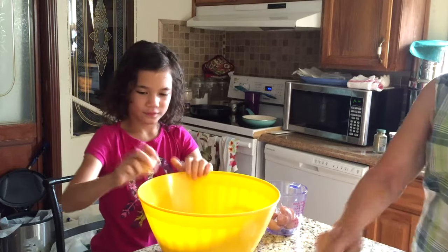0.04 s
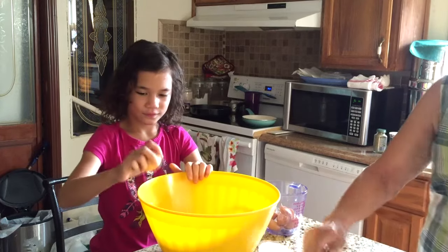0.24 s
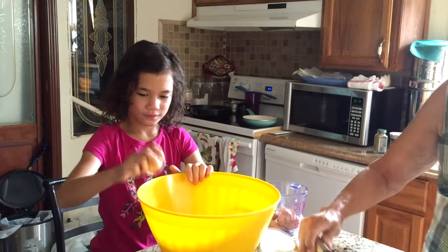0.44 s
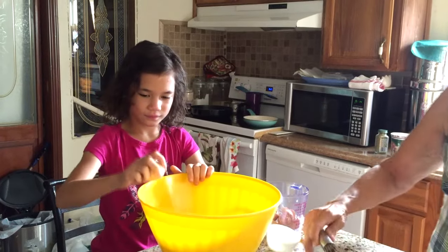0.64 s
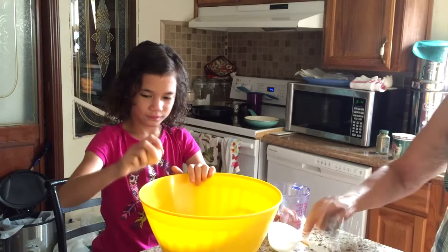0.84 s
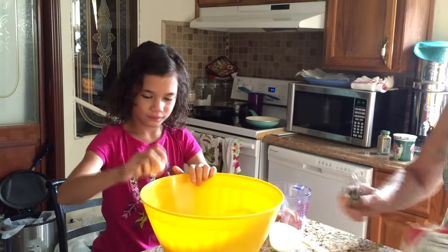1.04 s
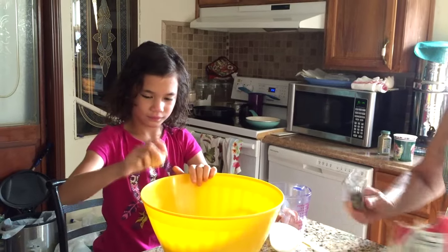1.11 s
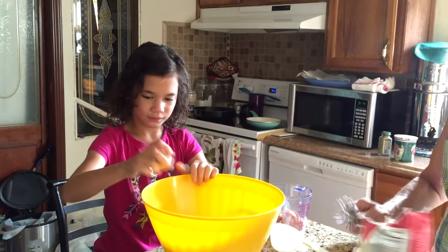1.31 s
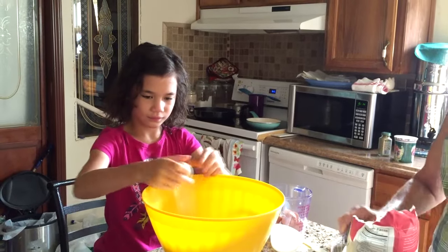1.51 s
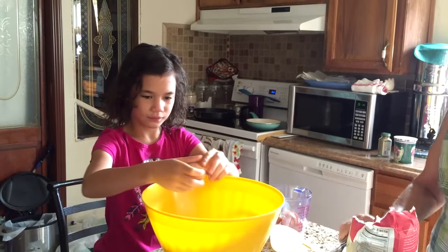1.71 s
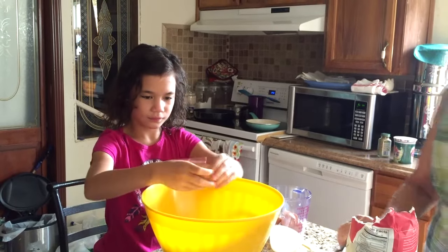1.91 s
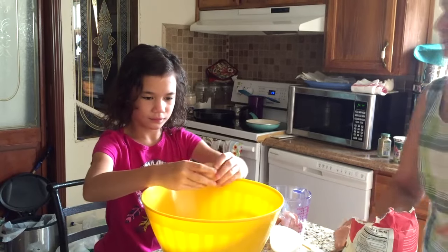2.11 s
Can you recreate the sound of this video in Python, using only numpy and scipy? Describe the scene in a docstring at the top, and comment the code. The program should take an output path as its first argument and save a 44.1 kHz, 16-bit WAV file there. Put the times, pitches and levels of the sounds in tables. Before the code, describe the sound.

Hollow clacks of an egg cracked on a plastic bowl, then a rustle and clinks.

```python
"""An egg is knocked on the rim of a big plastic bowl, close to one microphone in a quiet kitchen.
The rim clacks, the wall thumps, the bowl rocks back, and the last blow crushes the shell.
Bits of shell tick. Something, probably a paper bag, slides over the counter with a friction hiss,
and metal utensils clink at the end. Low resonances of the room linger after each knock."""
import sys
import numpy as np
from scipy import signal
from scipy.fft import rfft, irfft
from scipy.io import wavfile
from scipy.ndimage import uniform_filter1d

SR = 44100
rng = np.random.default_rng(int(sys.argv[2]) if len(sys.argv) > 2 else 0)


def output_pcm(signal):
    """Save a mono or channel-first signal as 16-bit PCM at the path in sys.argv[1].

    Samples are clipped to [-1, 1] before scaling.
    """
    pcm = np.clip(np.atleast_2d(signal).T, -1, 1) * 32767
    wavfile.write(sys.argv[1], SR, np.round(pcm).astype(np.int16))


N = 94815
HIT_SAMPLES = 24576


def undb(db):
    """Decibels to gain."""
    return 10 ** (np.asarray(db) / 20)


def clock(size=HIT_SAMPLES):
    """Time of each sample in seconds."""
    return np.arange(size) / SR


def hiss(size=HIT_SAMPLES):
    """White noise."""
    return rng.standard_normal(size)


def wander(rate_hz, size=HIT_SAMPLES):
    """Slow random drift with a spread near 1."""
    step = int(SR / rate_hz)
    return uniform_filter1d(np.repeat(hiss(size // step + 1), step), step)[:size]


def fade(t60):
    """Exponential decay, 60 dB in t60 seconds."""
    return np.exp(-np.log(1000) * clock() / t60)


def add(out, at, x):
    """Mix a sound in at a time."""
    part = out[int(at * SR):][:len(x)]
    part += x[:len(part)]


def colour(x, points, size=4096):
    """Minimum-phase filter through (f/Hz, level/dB) points; keeps the power of white noise."""
    hz, db = np.array(points).T
    log_hz = np.log(np.fft.rfftfreq(size, 1 / SR) + 1)
    cepstrum = irfft(np.log(undb(np.interp(log_hz, np.log(hz), db))))
    cepstrum[1:size // 2] *= 2
    cepstrum[size // 2 + 1:] = 0
    impulse = irfft(np.exp(rfft(cepstrum)))[:size // 2]
    return signal.fftconvolve(x, impulse / np.linalg.norm(impulse))[:len(x)]


def ring(modes, rattle_rad=0):
    """Resonances as decaying sines; loose contact can jolt their phase."""
    out = 0
    for hz, db, t60 in modes:
        jolt = rattle_rad * wander(rate_hz=130) if rattle_rad else 0
        out += undb(db) * fade(t60) * np.sin(2 * np.pi * hz * clock() + jolt)
    return out


def flex(modes, pitch=1):
    """Heavily damped bending that swells and dies within a few cycles."""
    out, t = 0, clock()
    for hz, rise, db in modes:
        swell = (t / rise * np.exp(1 - np.minimum(t / rise, 20))) ** 2
        out += undb(db) * swell * np.sin(2 * np.pi * hz * pitch * t)
    return out


def rubbing(levels, spectrum, flicker_db=.6):
    """Fine-grained friction hiss with uneven pressure."""
    db = np.interp(clock(N), *np.array(levels).T) + flicker_db * wander(rate_hz=35, size=N)
    return undb(db) * colour(rng.laplace(0, np.sqrt(.5), N), spectrum)


# Room tone spectrum: f/Hz, level/dB
AIR_SPECTRUM = [(25, -11), (60, -3), (150, 4), (300, -1), (600, -10), (1200, -14), (2100, -17),
                (3500, -21.5), (9000, -35), (16000, -38)]

def room_tone():
    """The kitchen's quiet air, a low rush all around the microphone."""
    return undb(-64.5) * colour(hiss(N), AIR_SPECTRUM)


# Diffuse tail by band: f/Hz, t60/s, level/dB
TAIL_BANDS = [(100, 0.19, 1.5), (213, 0.3, 3.5), (450, 0.29, 0), (905, 0.34, 3.5), (1600, .36, -0.5),
              (3060, 0.25, 1.5), (6000, .28, 1), (13900, .2, -20.5)]
# First echoes: t/s, gain
FIRST_ECHOES = [(0.0132, 0.057), (0.0204, 0.12)]

def kitchen(direct, tail_db=-3.5, build_s=.004):
    """Direct sound reaches the microphone, then echoes off wall and cupboards and a short tail."""
    response, noise = np.zeros(HIT_SAMPLES), rfft(hiss())
    log_hz = np.log(np.fft.rfftfreq(HIT_SAMPLES, 1 / SR) + 1)
    log_centres = np.log(np.array(TAIL_BANDS)[:, 0])
    for share, (_, t60, db) in zip(np.eye(len(TAIL_BANDS)), TAIL_BANDS):
        band = irfft(noise * np.interp(log_hz, log_centres, share))
        envelope = fade(t60) * (1 - np.exp(-clock() / build_s))
        response += undb(db + tail_db) * envelope / np.linalg.norm(envelope) * band
    for lag, gain in FIRST_ECHOES:
        response[int(lag * SR)] += gain
    return direct + signal.fftconvolve(direct, response)[:N]


# Handling noise: t/s, level/dB
HANDLING_LEVELS = [(0.225, -89), (0.25, -60), (0.31, -69.5), (0.37, -60.5), (0.41, -68.5), (0.45, -54.5),
                   (0.55, -59.5), (0.6, -74)]

def handling():
    """Things rub faintly on the counter, with the colour of the ticks."""
    return rubbing(HANDLING_LEVELS, TICK_SPECTRUM)


# Course of the slide: t/s, level/dB
SLIDE_LEVELS = [(0.71, -75), (0.75, -50.5), (0.9, -53.5), (1.05, -48.5), (1.35, -48.5), (1.5, -50.5),
                (1.6, -56.5), (1.665, -58), (1.70, -67.5), (1.8, -68.5)]
# Its friction spectrum: f/Hz, level/dB
SLIDE_SPECTRUM = [(200, -26.5), (800, -14), (1400, -1), (2300, 7.5), (3300, -5), (5000, -4.5), (6500, -6),
                  (9300, -4), (10600, -13.5), (13000, -8.5), (16000, -9.5)]

def bag_slide():
    """Something like a paper bag drags over the counter."""
    return rubbing(SLIDE_LEVELS, SLIDE_SPECTRUM)


# Clinks: t/s, bright level/dB, dull level/dB
UTENSIL_CLINKS = [(2.0295, -37.5, -36.5), (2.0353, -34.5, -45.5), (2.0935, -37.5, -35), (2.1455, -43, -46)]
# Metal modes, dull and bright: f/Hz, level/dB, t60/s
DULL_MODES = [(655, -5, 0.18), (1155, -3, 0.1), (1642.5, -0.5, 0.15), (1953, 2, 0.044), (2600, -37, 0.094)]
BRIGHT_MODES = [(4445, -20.5, 0.18), (6126, -7.5, 0.17), (7429, -19, 0.25), (8600, -11.5, 0.17),
                (8430, -5, 0.32), (8767, 1, 0.15), (9520, -1.5, .15), (9860, -7.5, 0.14), (11450, -4.5, .2),
                (13360, -8, 0.2)]
# Crowded upper modes: f/Hz, level/dB
CLATTER_SPECTRUM = [(300, -30), (1100, -0.5), (2200, 4), (3200, -3), (7500, -3.5), (9000, 4.5),
                    (10500, 3.5), (13000, 1.5), (16000, -7)]

def utensils(clatter_db=4.5, modes_db=-4):
    """Thin metal pieces strike each other, rattle and ring."""
    out = np.zeros(N)
    for at, bright_db, dull_db in UTENSIL_CLINKS:
        clatter = undb(clatter_db) * colour(hiss() * fade(t60=.19), CLATTER_SPECTRUM) / 2
        bright = undb(modes_db) * ring(BRIGHT_MODES, rattle_rad=.55)
        dull = undb(modes_db) * ring(DULL_MODES, rattle_rad=.55)
        add(out, at, undb(bright_db) * (bright + clatter) + undb(dull_db) * dull)
    return out


# Ticks: t/s, snap level/dB, body level/dB
SMALL_TICKS = [(0.2745, -31, -52), (0.4163, -24.5, -26), (0.4306, -72, -20.5), (0.4315, -30, -19.5),
               (0.7434, -29, -36), (0.7507, -36, -62), (0.829, -31.5, -18), (1.576, -41, -42),
               (1.615, -36.5, -47.5), (1.643, -38.5, -38), (1.820, -44.5, -54), (1.872, -51, -49),
               (2.001, -64, -43)]
# Snap spectrum: f/Hz, level/dB
TICK_SPECTRUM = [(500, -7.5), (2000, 7.5), (4000, -1), (6500, -4), (8700, 4.5), (10500, -11), (14000, -5),
                 (16000, -5)]

def ticks(decay_s=.001):
    """Bits of shell and handled things snap brightly, each with a little hollow body."""
    snaps, bodies, body = np.zeros(N), np.zeros(N), flex(RIM_FLEX)
    envelope = .5 * np.exp(-clock() / decay_s)
    for at, snap_db, body_db in SMALL_TICKS:
        add(snaps, at, undb(snap_db) * envelope * hiss())
        add(bodies, at, undb(body_db) * body)
    return colour(snaps, TICK_SPECTRUM) + bodies


# Eggshell spectrum: f/Hz, level/dB
SHELL_SPECTRUM = [(300, -12), (1000, -2.5), (1600, 3.5), (2700, 9.5), (4000, -8), (6500, -7), (9000, -10.5),
                  (10500, -13.5), (14000, -17), (16000, -8.5)]

def shell_crack(snap_s=.001, crush_s=.009):
    """The shell snaps, then crushes in a grainy burst that stops short."""
    t = clock()
    snap = np.exp(-t / snap_s)
    crush = undb(-1) * np.exp(-t / crush_s) / (1 + (t / crush_s) ** 10)
    return colour((snap + crush) * rng.laplace(0, .25, HIT_SAMPLES), SHELL_SPECTRUM)


# The bowl's quick bending under a blow: f/Hz, rise/s, level/dB
WALL_FLEX = [(456, .0021, -1), (202.4, 0.0063, -22), (554, 0.0024, -16.5), (89, .025, -46),
             (864, 0.0023, -19)]
RIM_FLEX = [(1662, 0.00057, 1.5), (1358, 0.0019, -14), (2175, 0.00067, -27.5), (2865, 0.00075, -19)]
# Ringing of the rim: f/Hz, level/dB, t60/s
RIM_RING = [(1268, -14, 0.073), (1326, 5, .26), (1473, 15, 0.15), (1473, 0.5, 0.15), (1672, 5, 0.083),
            (1710, -11, .25), (2217, -5.5, 0.2), (2660, -6.5, 0.12)]
# Low resonances of the room that linger after each knock: f/Hz, level/dB, t60/s
ROOM_RING = [(223.4, 3, 0.17), (405.8, 1, 0.4), (470, -22.5, 0.84), (503, -20, 0.23), (480, -16.5, 0.22),
             (536, 3, .3), (602, -18.5, 0.2), (782, -10.5, 0.32)]
# Knocks and nudges of egg and hand, and the bowl rocking back:
# t/s, thump level/dB, rim level/dB, shell level/dB, pitch ratio of the wall's bending
BOWL_KNOCKS = [(0.2273, -6.5, -13, -36, 1.024), (0.423, -33.5, -40.5, -56, 0.52),
               (0.4856, -8.5, -12.5, -36, 1.02), (0.5341, -13, -11, -33.5, 1.07),
               (0.5439, -23.5, -20.5, -37.5, 1.23), (0.755, -27.5, -40, -50.5, 1.04),
               (0.7667, -5.5, -4.5, -22.5, 1.028), (0.815, -11, -12, -32.5, 1.027),
               (0.836, -25, -18.5, -32.5, 0.93), (1.0595, -13.5, 1, -8, 0.98),
               (2.0118, -44, -28, -37, 0.93)]

def egg_on_bowl(wall_lag_s=.0011):
    """Up close the egg cracks on the rim; the bowl's wall thumps just after and sets the room ringing."""
    out = np.zeros(N)
    room_ring = undb(-30) * ring(ROOM_RING)
    clack = undb(-33.5) * ring(RIM_RING) - flex(RIM_FLEX)
    for at, thump_db, rim_db, shell_db, pitch in BOWL_KNOCKS:
        add(out, at, undb(rim_db) * clack + undb(shell_db) * shell_crack())
        add(out, at + wall_lag_s, undb(thump_db) * (flex(WALL_FLEX, pitch) + room_ring))
    return out


def scene():
    """Mono, at the counter: strikes with the kitchen's echo, dry friction and room tone."""
    low_cut = signal.butter(2, 75, "high", fs=SR, output="sos")  # small objects radiate little bass
    strikes = signal.sosfilt(low_cut, egg_on_bowl() + ticks() + utensils())
    return (kitchen(strikes) + room_tone() + bag_slide() + handling())[None]


def record(dry, top_hz=15750):
    """Softly rounds the loudest peaks; the microphone cuts the top."""
    high_cut = signal.ellip(10, .2, 80, top_hz, fs=SR, output="sos")
    return signal.sosfilt(high_cut, np.tanh(dry))


dry = scene()
out = record(dry)
output_pcm(out)
```